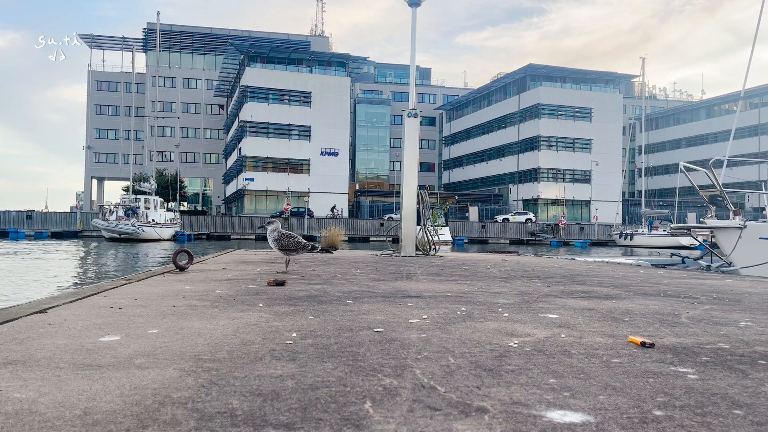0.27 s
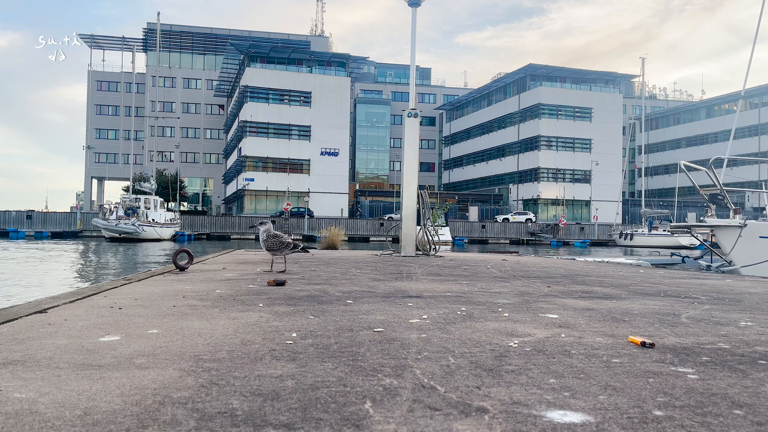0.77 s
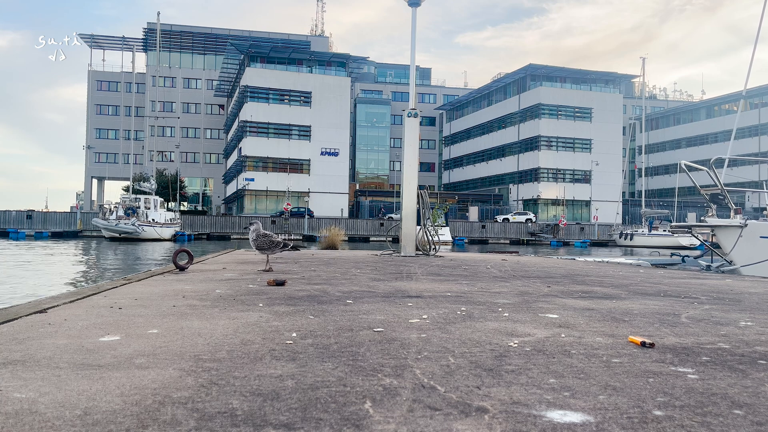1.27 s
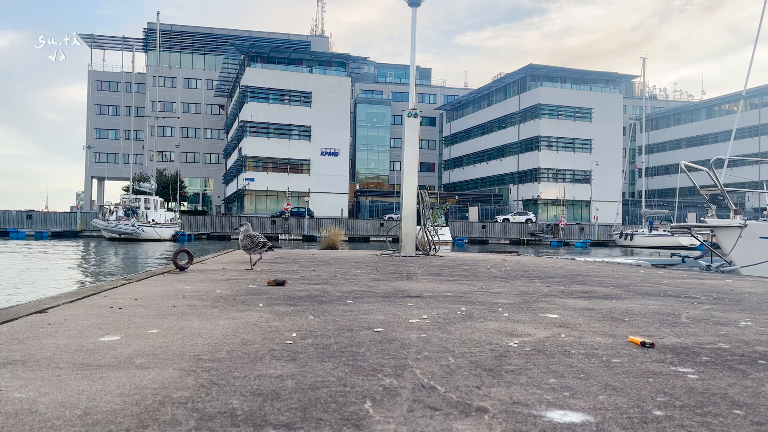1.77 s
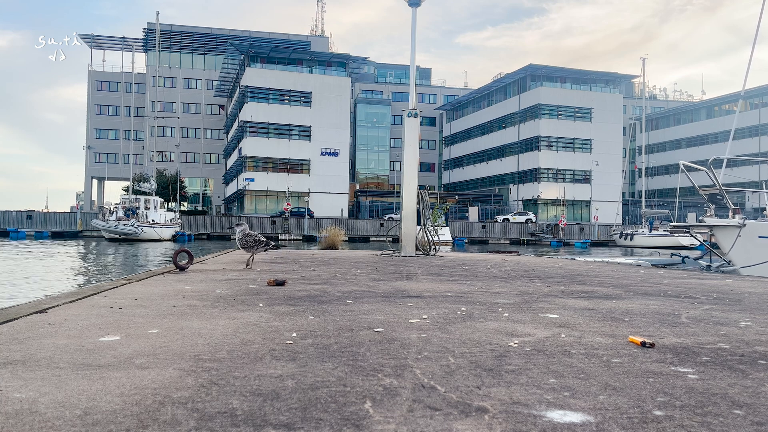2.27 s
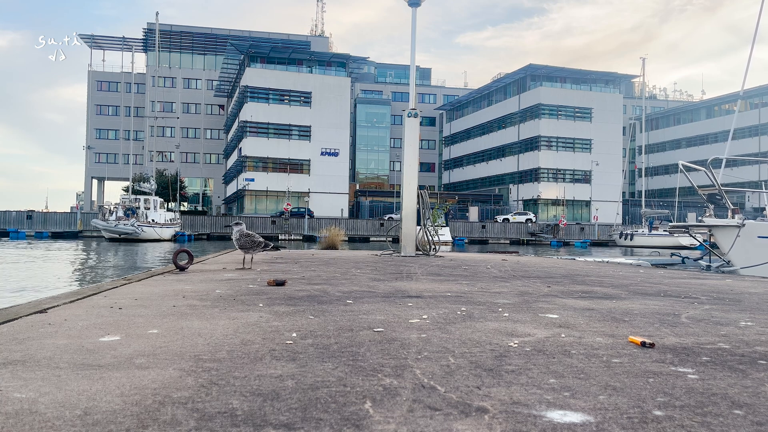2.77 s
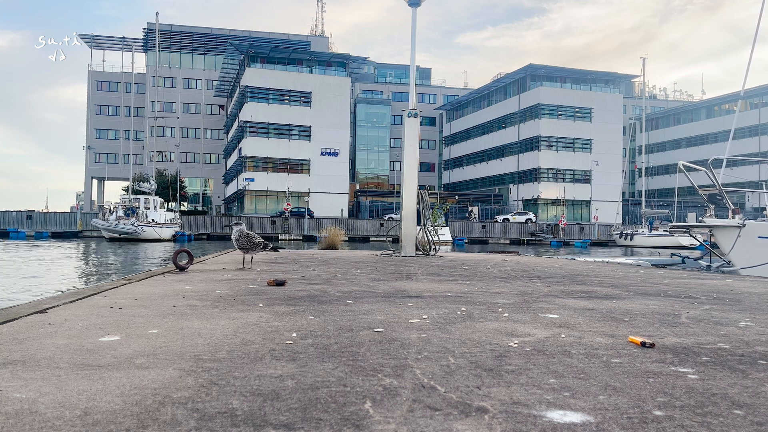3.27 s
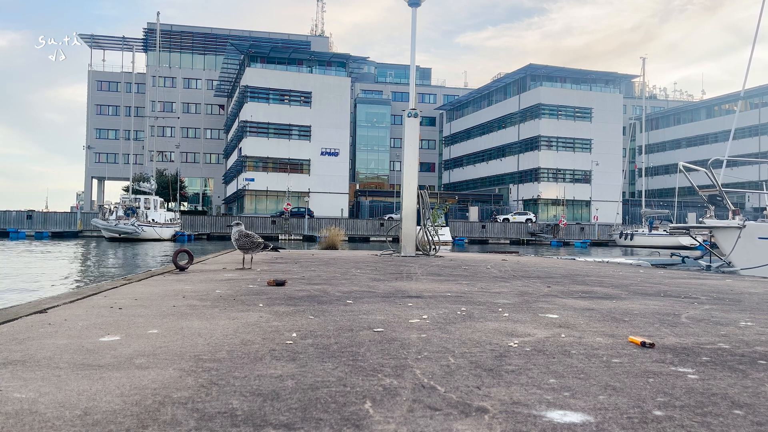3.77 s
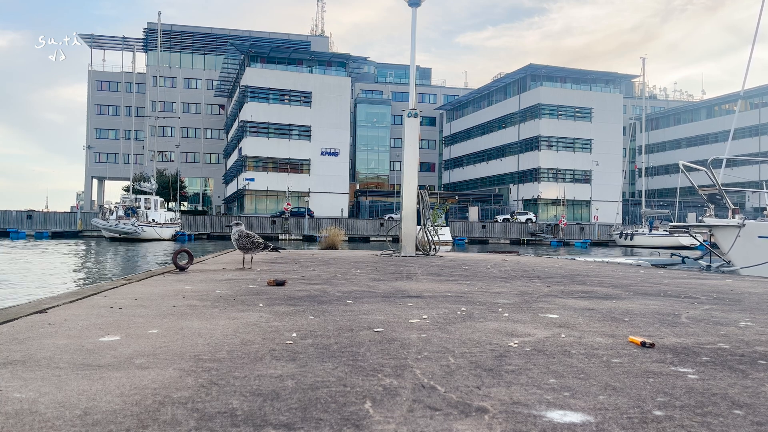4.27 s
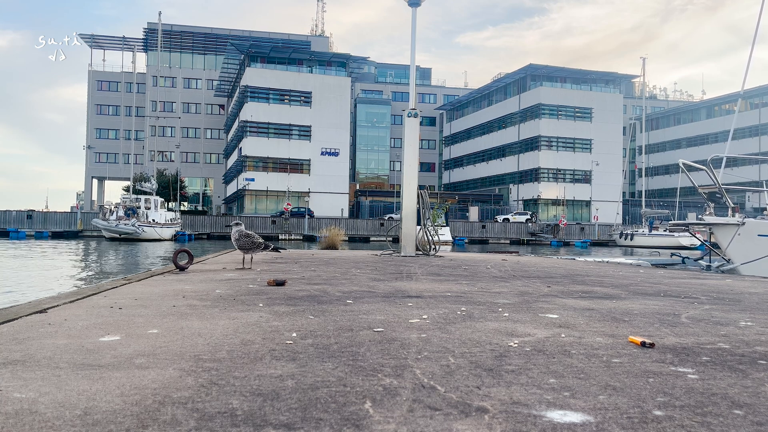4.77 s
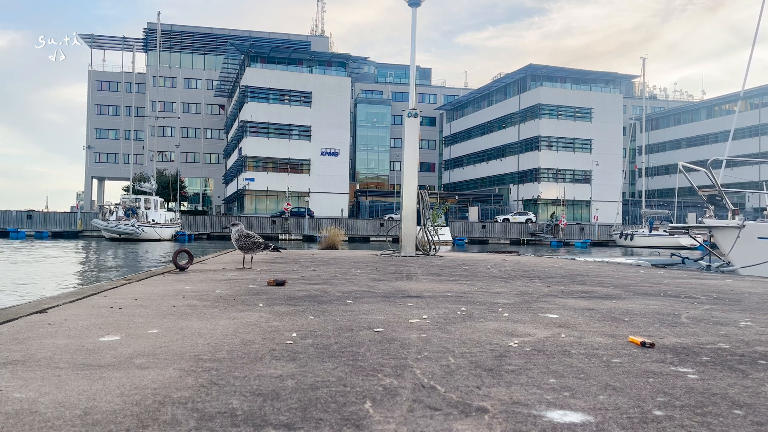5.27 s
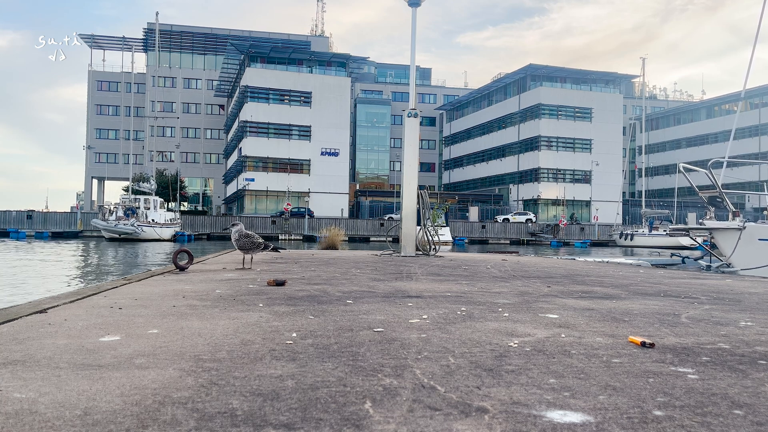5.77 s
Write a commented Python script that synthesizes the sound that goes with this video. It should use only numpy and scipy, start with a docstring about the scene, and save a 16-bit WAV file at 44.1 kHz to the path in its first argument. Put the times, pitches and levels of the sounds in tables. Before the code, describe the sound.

Outdoors on a harbour quay, a steady low town rumble and wind buffeting the microphone lie under young gulls. A sharp, thin falling cry comes early, weaker ones follow, then a hoarse broken cry midway and a strong one near the end. Other gulls answer faintly from both sides. Echoes return from buildings across the water; a small songbird whistles faintly high up twice.

```python
"""Open harbour quay: young gulls cry in short falling notes, ahead and to both sides, and a small songbird is heard.
Cries are stacks of gliding partials with bursts of hoarse pulsed noise; the songbird is bending pure tones.
Wind is low noise with timed thumps; the town's rumble, a hiss stronger on the left and a thin treble are
coloured noise. Small ticks are ringing clicks. The quay close by and the buildings across the water
return the cries as scattered echoes, and the buildings also as single slaps."""
import sys
import numpy as np
from scipy import signal
from scipy.fft import rfft, irfft, next_fast_len
from scipy.io import wavfile
from scipy.ndimage import uniform_filter1d, map_coordinates

SR = 44100
rng = np.random.default_rng(int(sys.argv[2]) if len(sys.argv) > 2 else 0)


def store_pcm(level_fs):
    """Save levels as 16-bit WAV."""
    pcm = np.round(np.clip(level_fs, -1, 1) * 32767).astype(np.int16)
    wavfile.write(sys.argv[1], SR, np.atleast_2d(pcm).T)


N = 265658  # samples in the scene


def gain_of(db):
    """Turn decibels into a factor on the wave."""
    return 10 ** (np.asarray(db) / 20)


def evened(x):
    """Scale to an average (RMS) strength of 1."""
    return x / np.sqrt(np.mean(x ** 2) + 1e-20)


def smoothed(x, size):
    """Two running averages turn fast noise into slow wandering."""
    return uniform_filter1d(uniform_filter1d(x, size=size), size=size)


def read(points, hz):
    """Read a curve between its points, with pitch spaced as the ear hears it (logarithmically)."""
    f, value = np.transpose(points)
    return np.interp(np.log(hz + 1), np.log(f + 1), value)


def shape(x, colour):
    """Raise or lower each frequency by a curve in dB."""
    size = next_fast_len(N + 4096)
    hz = np.fft.rfftfreq(size, 1 / SR)
    return irfft(rfft(x, size) * gain_of(read(colour, hz)), size)[..., :N]


def resonate(x, hz, width):
    """One resonance of gain 1 at its peak, applied twice for dark valleys."""
    b, a = signal.iirpeak(hz, hz / width, SR)
    return signal.lfilter(b, a, signal.lfilter(b, a, x))


def play(sounds):
    """Place each (start, sound) on two channels and add them up."""
    mix = np.zeros((2, N))
    for s, sound in sounds:
        part = mix[:, round(s * SR):][:, :sound.shape[-1]]
        part += sound[..., :part.shape[-1]]
    return mix


def wash(colour, level, patchy_db, alike):
    """Two channels of noise with drifting patches of pitch and time, following a level curve."""
    # how alike left and right are, before the factor alike: (f/Hz, likeness 0-1)
    likeness = [(60, .94), (250, .84), (800, .83), (1500, .67), (2000, .45), (4000, .5), (6000, .2),
                (9000, .6)]
    frames, hz = N // 256 + 5, np.fft.rfftfreq(1024, 1 / SR)
    a, b, c, d, patches = rng.standard_normal((frames, 513, 5)).T
    patches = uniform_filter1d(uniform_filter1d(patches, size=14, axis=0), size=14, axis=1)
    patches = evened(patches)
    same = np.clip(alike * read(likeness, hz), -1, 1)[:, None]
    left, other = a + 1j * b, c + 1j * d
    spectrum = np.array([left, same * left + np.sqrt(1 - same ** 2) * other])
    spectrum *= gain_of(read(colour, hz)[:, None] + patchy_db * patches)
    noise = evened(signal.istft(spectrum, nperseg=1024, noverlap=768)[1][:, :N])
    s, db = np.transpose(level)
    return gain_of(np.interp(np.arange(N) / SR, s, db)) * noise


def town_rumble():
    """Steady noise, strongest in the lows and fading towards the treble."""
    # tone colour of the town: (f/Hz, relative level per Hz/dB)
    colour = [(60, -49), (120, 2), (250, -2), (600, -5.5), (1000, -11.5), (1550, -21), (1800, -29),
              (3000, -39), (4600, -47), (6200, -57), (8500, -66), (12000, -65.5), (13000, -79),
              (17000, -83.5)]
    return wash(colour, [(0, -45), (6, -45)], patchy_db=1.0, alike=0.85)


def wind(steadied=0.6, alike=0.96):
    """Low buffeting, nearly alike at both ports of the microphone, with timed thumps on top."""
    # tone colour of the wind: (f/Hz, relative level per Hz/dB)
    colour = [(12, -46.5), (25, -31), (33, -10.5), (42, -1.5), (55, 4.5), (70, 0), (95, -1), (125, -10.5),
              (170, -18), (260, -43), (400, -92.5)]
    # level between buffets: (t/s, level/dB)
    calm = [(0, -43), (.5, -46.5), (.87, -47), (1.2, -43.5), (1.6, -46.5), (2.0, -43.5), (2.4, -45),
            (2.6, -37), (2.8, -44.5), (3.08, -36), (3.25, -44.5), (3.45, -39), (3.7, -48), (3.95, -41),
            (4.2, -49.5), (4.6, -43), (4.8, -47.5), (5.3, -46.5), (6.02, -46)]
    # single thumps: (peak t/s, level/dB, length/s)
    buffets = [(0.229, -47, 0.048), (1.217, -34.5, 0.045), (1.35, -38.5, 0.057), (1.417, -36, 0.032),
               (1.571, -38.5, 0.088), (1.661, -34.5, 0.048), (1.764, -31.5, 0.043), (2.308, -37.5, 0.082),
               (2.521, -33.5, 0.052), (2.676, -35.5, 0.072), (2.936, -35.5, 0.045), (2.994, -30, 0.039),
               (3.359, -32, 0.035), (3.776, -37, 0.035), (3.851, -34, 0.018), (3.978, -35.5, 0.023),
               (4.133, -33, 0.039), (4.57, -39, 0.091), (4.889, -39.5, 0.088), (5.366, -38, 0.022),
               (5.457, -39.5, 0.035), (5.697, -38, 0.017), (5.795, -43, 0.019), (6.002, -30.5, 0.033)]
    left, other = shape(rng.standard_normal((2, N)), colour)
    x = evened(np.array([left, alike * left + np.sqrt(1 - alike ** 2) * other]))
    # part of the chance throb is evened out, since the buffets carry the lumps
    throb = np.sqrt(uniform_filter1d((x ** 2).mean(0), size=1500) + 1e-3)
    t = np.arange(N) / SR
    thumps = sum(gain_of(db) * np.exp(-(2 * (t - s) / length) ** 2) for s, db, length in buffets)
    level = np.hypot(gain_of(np.interp(t, *np.transpose(calm))), thumps)
    return evened(x / throb ** steadied) * level


def left_hiss():
    """Patchy high noise that swells and sinks, stronger on the left."""
    # tone colour of the hiss: (f/Hz, relative level per Hz/dB)
    colour = [(1500, -20.5), (2600, -3.5), (4000, -0.5), (5000, -7), (5900, -20), (8000, -71)]
    # level before the left-right tilt: (t/s, level/dB)
    level = [(0.0, -78), (0.32, -83), (0.6, -74), (0.8, -84), (1.02, -79), (1.41, -74), (1.83, -78.5),
             (2.7, -76), (2.8, -79.5), (3.2, -83.5), (3.97, -80), (4.48, -78.5), (4.64, -79), (4.9, -85.5),
             (5.15, -77.5), (5.3, -84), (5.47, -74), (5.65, -74.5), (6.02, -74.5)]
    return wash(colour, level, patchy_db=2.2, alike=0.92) * gain_of([[5], [-4]])  # dB left, right


def thin_treble():
    """A faint patchy sheen of very high noise that comes and goes."""
    # tone colour of the sheen: (f/Hz, relative level per Hz/dB)
    colour = [(4500, -31), (5800, -10.5), (6800, 4), (8000, -4.5), (8600, -14), (11500, -10.5),
              (12500, -39)]
    # its swelling and sinking: (t/s, level/dB)
    level = [(0.0, -74), (.12, -91), (0.35, -93), (0.45, -83), (.75, -87.5), (1.3, -94), (2.05, -101),
             (2.14, -86.5), (2.72, -84.5), (2.8, -101), (3.3, -93.5), (3.97, -103), (4.4, -97),
             (4.76, -89.5), (5.1, -101), (5.8, -100), (6.02, -81)]
    return wash(colour, level, patchy_db=3.5, alike=0.59)


def note(hz, db, lag, lean_db, rough, halves, fade_s=0.005, airflow_db=0):
    """Partials on one pitch; rough cycles smear the upper ones, strong-weak cycles add lines half-way between."""
    n = len(hz)
    drift, jitter, shake = (evened(smoothed(rng.standard_normal(n), size)) for size in (250, 60, 40))
    air = evened(resonate(rng.standard_normal(n), 7400, 2400)) * gain_of(db[-1] + airflow_db)
    turns = np.cumsum(hz * (1 + .003 * drift)) / SR + .09 * rough * np.tanh(jitter)
    side = np.array([[-.5], [.5]])  # left, right
    # the moving throat makes each partial swell and dip on its own
    flicker = evened(smoothed(rng.standard_normal((6, n)), 300))
    db = np.array(db) + 2.2 * flicker[:len(db)]
    partials = [gain_of(d) * np.sin(2 * np.pi * (k + 1) * turns + side * lag) for k, d in enumerate(db)]
    tone = partials[0] + sum(partials[1:]) * (1 + 2 * halves * np.cos(np.pi * turns))
    tone = np.sqrt(2) * tone * (1 + .9 * rough * np.tanh(shake)) + air
    tone = tone * gain_of(-side * lean_db)
    return tone * signal.windows.tukey(n, min(1, 2 * fade_s * SR / n))


def cry(start, hold, slide, held_hz, end_hz, db1, db2, db3, db4, first_change_db, upper_change_db, side, voice):
    """The pitch settles, holds, then slides to its end while the levels drift and single partials swell or dip."""
    # kinds of voice: name: (roughness 0-1, half-pitch share 0-1, share of the second flutter 0-1)
    voices = {"clear": (.11, 0, .05), "split": (.16, .03, .18), "husky": (.25, .08, .05),
              "rough": (.5, .17, .1), "doubled": (.42, .38, .05), "broken": (.45, .7, .1),
              "hoarse": (.7, .5, .2)}
    # where a gull sits: name: (left's lag/radians, left minus right/dB), before the microphone ports
    sides = {"ahead": (0, 0), "left": (2.5, 4), "right": (-2.6, -2)}
    # a partial swells or dips as the throat shifts: (middle t/s, partial, change/dB, length/s)
    shifts = [(0.071, "fourth", -10.5, .03), (.14, "fourth", -13.5, .04), (0.41, "third", -11.5, 0.052),
              (.47, "third", -2.5, .02), (.49, "fourth", -14, .06), (.46, "fifth", -13, .2),
              (1.14, "third", -15.5, 0.034), (1.185, "third", 7, .04), (1.13, "second", -11.5, 0.018),
              (1.2, "second", -7.5, 0.043), (1.17, "fourth", -9, .15), (2.1, "fourth", -9, .1),
              (2.14, "third", -14, 0.054), (2.118, "second", -7.5, .015), (.5, "second", -3, .04),
              (3.29, "sixth", -12, .1), (3.4, "sixth", -14, .3), (3.39, "fifth", -12, 0.12),
              (5.22, "fifth", 5.5, .05), (3.355, "third", -3, 0.014), (3.297, "first", -11, 0.0051),
              (3.295, "second", -13.5, .008), (3.295, "third", -11, .008), (3.355, "second", -7, 0.045),
              (3.385, "second", 3.5, 0.016), (3.375, "third", -5, 0.017), (3.425, "third", -14, 0.031),
              (3.43, "second", -7, .03), (3.35, "fourth", -13, 0.023), (3.435, "fourth", -2, 0.025),
              (3.51, "third", -13, 0.044), (3.46, "fourth", -3.5, 0.088), (5.258, "third", -29, 0.02),
              (5.32, "third", 5.5, 0.095), (5.364, "third", -10.5, 0.016), (5.388, "third", -4, 0.0092),
              (5.405, "third", 7, 0.053), (5.365, "second", 6, 0.091), (5.4, "first", -4.5, .04),
              (5.35, "fourth", 3.5, .05), (5.29, "fifth", -1, 0.022), (5.34, "fifth", 2.5, 0.081),
              (5.383, "fifth", -8.5, .03), (5.43, "fifth", 2, .07), (5.58, "third", 4, .06),
              (5.06, "second", -8, .06), (5.06, "third", -8, .06), (5.06, "first", -3, 0.043),
              (5.33, "sixth", -9, 0.059)]
    # names of the partials, lowest first
    partial_names = ("first", "second", "third", "fourth", "fifth", "sixth")
    t = np.arange(0, hold + slide, 1 / SR)
    slid = np.clip((t - hold) / slide, 0, 1) ** .65  # power under 1: the slide is fastest at first
    settling = 1 + .011 * np.exp(-t / .018)  # starts a little sharp
    hz = held_hz * settling + (end_hz - held_hz) * slid
    upper = (db2, db3, db4, db4 - 7.5, db4 - 9.5)  # fifth and sixth lie below the fourth
    db = [db1 + first_change_db * t / t[-1]] + [d + upper_change_db * t / t[-1] for d in upper]
    for s, partial, change_db, length in shifts:
        if start - length < s < start + t[-1] + length:
            k = partial_names.index(partial)
            db[k] = db[k] + change_db * np.exp(-(2 * (start + t - s) / length) ** 2)
    taper = np.minimum((t[-1] - t) / .015, 1)  # the last 15 ms die away
    rough, halves, flutter = voices[voice]
    # a second, slower vibration sets in with the slide and puts side lines round each partial
    flutter_hz = 325
    taper = taper * (1 + 2 * flutter * np.sqrt(slid) * np.cos(2 * np.pi * flutter_hz * t))
    hz = uniform_filter1d(hz, size=350, mode="nearest")
    return start, taper * note(hz, db, *sides[side], rough, halves)


def gull_cries():
    """All the voiced gull notes, each a stack of six partials."""
    # one row a note: (start t/s, hold/s, slide/s, held f/Hz, end f/Hz,
    # basic level/dB of partials 1, 2, 3, 4, change/dB by the end of partial 1, of the upper ones, side, voice)
    rows = [ (.005, 0.022, 0.052, 1280, 1210, -78, -97, -69, -100, -4, -8, "ahead", "husky"),
            (0.076, 0.0034, 0.062, 1410, 1307, -76.5, -66.5, -92.5, -77.5, 1, 0.5, "ahead", "clear"),
            (.322, 0.012, 0.038, 1262, 1115, -43, -88.5, -99.5, -100, 4, -6.5, "ahead", "husky"),
            (0.355, 0.055, 0.026, 1472, 1525, -44.5, -86.5, -99, -105, 12, 15, "ahead", "clear"),
            (.42, 0.046, .056, 1309, 1216, -31, -56, -61, -76.5, -14.5, -0.5, "ahead", "split"),
            (0.499, 0.027, 0.034, 1900, 1736, -63, -81, -90, -100, -6, -8, "left", "hoarse"),
            (.51, 0.044, 0.06, 1290, 1158, -45.5, -68, -75.5, -93.5, -2, -6.5, "ahead", "hoarse"),
            (0.551, 0.017, 0.02, 1587, 1550, -51, -85.5, -100, -101, -4, -2, "ahead", "husky"),
            (0.951, .1, 0.058, 1095, 1150, -61, -95.5, -93.5, -100, -5, -1, "right", "husky"),
            (1.13, 0.0023, 0.14, 1559, 1306, -48, -62.5, -73.5, -88, 2.5, -15, "ahead", "husky"),
            (1.253, 0.0015, 0.055, 1123, 933, -50, -88, -87, -87, -1, -5.5, "ahead", "husky"),
            (1.727, 0.035, 0.023, 1260, 1260, -77.5, -73.5, -87.5, -100, -2.5, 5.5, "left", "clear"),
            (1.72, .002, 0.052, 902, 1075, -56.5, -92.5, -95, -94, -2.5, -0.5, "right", "husky"),
            (1.775, .045, 0.094, 1140, 1052, -55, -84, -86, -100, -7, -7.5, "right", "husky"),
            (2.079, 0.00094, 0.088, 1550, 1334, -49, -69.5, -70, -80, 5.5, -7.5, "ahead", "husky"),
            (2.155, 0.02, 0.019, 1089, 1013, -46.5, -89, -93, -86, 1, 2, "ahead", "rough"),
            (2.52, 0.085, 0.087, 1133, 1040, -60, -99.5, -88.5, -85.5, -5.5, -8, "right", "clear"),
            (3.28, .015, 0.024, 1328, 1300, -44, -64, -58.5, -74, -6.5, -9.5, "ahead", "broken"),
            (3.326, 0.01, 0.033, 1630, 1670, -62, -68.5, -72, -86, 1, 10, "ahead", "broken"),
            (3.35, 0.0032, .086, 1579, 1414, -42.5, -53, -53.5, -61, -4, -8.5, "ahead", "husky"),
            (3.43, 0.055, .045, 1148, 1077, -48, -62, -55.5, -61.5, 1, -14, "ahead", "doubled"),
            (3.724, 0.017, 0.032, 1140, 1103, -60, -72.5, -82.5, -98, 1.5, 1, "left", "rough"),
            (3.73, .05, 0.037, 1485, 1450, -68, -72.5, -79, -100, 1, 2, "ahead", "rough"),
            (3.797, 0.01, 0.04, 1250, 1237, -65, -68.5, -74, -100, -7.5, 1, "left", "husky"),
            (3.83, .03, .065, 1110, 1264, -66, -83.5, -87, -100, -1.5, -1, "right", "rough"),
            (5.049, 0.077, 0.032, 1112, 1147, -62.5, -74.5, -74.5, -104, 9.5, 12, "left", "broken"),
            (5.149, 0.04, 0.033, 1262, 1200, -58, -55, -63.5, -87, -4, -2.5, "left", "clear"),
            (5.197, 0.02, 0.025, 1154, 1154, -41.5, -68.5, -65.5, -71, -2, 2, "ahead", "doubled"),
            (5.231, 0.013, 0.021, 1572, 1590, -32.5, -66, -76, -75, -4.5, -2, "ahead", "husky"),
            (5.251, .11, .112, 1326, 1207, -33, -52.5, -50, -54, -10.5, -4, "ahead", "split"),
            (5.46, .14, .04, 1689, 1464, -57.5, -72.5, -79, -92, -2, 1, "ahead", "rough"),
            (5.469, 0.1, 0.07, 1214, 1114, -49, -68.5, -66.5, -68, 1, -11.5, "ahead", "hoarse"), ]
    return play(cry(*row) for row in rows)


def facades(x, gap_s):
    """After a gap, scattered echoes of random sign, each band dying at its own speed."""
    # how long echoes last: (f/Hz, time to fall by 60 dB/s)
    dying = [(1000, 1.5), (2600, 0.53), (4000, 16), (5300, 2), (6500, 1.1)]
    taps = np.zeros((2, SR))
    at = np.arange(0, SR - 20, 20) + rng.integers(0, 20, (2, SR // 20 - 1))
    np.put_along_axis(taps, at, rng.choice([-1., 1.], at.shape), 1)
    hz, t, spectrum = signal.stft(taps, SR, nperseg=256)
    fall = gain_of(-60 * t / read(dying, hz)[:, None])
    tail = signal.istft(spectrum * fall, SR, nperseg=256)[1]
    tail = np.pad(tail / np.linalg.norm(tail[0]), ((0, 0), (round(gap_s * SR), 0)))
    return signal.fftconvolve(x[None], tail, axes=1)[:, :N]


def near_quay(x):
    """Soft scattered echoes that come back almost at once."""
    return gain_of(-24) * facades(x, gap_s=0.016)


def slaps(x):
    """Flat walls return whole cries, one after another."""
    # single returns: (delay/s, level/dB, left minus right/dB), on top of the walls' own tone colour
    walls = [(.205, -22.5, 2.5), (.275, -17.5, 0), (.43, -24.5, -2), (.585, -22, -0.5)]
    return play((delay, x * gain_of([[db + lean_db / 2], [db - lean_db / 2]])) for delay, db, lean_db in walls)


def wavered(x):
    """Moving air over the water stretches and squeezes the trip, so distant tones waver."""
    waver_s = .00009  # typical (RMS) change of delay
    at = np.arange(N) + waver_s * SR * evened(smoothed(rng.standard_normal(N), 700))
    return np.array([map_coordinates(channel, [at], order=3, mode="nearest") for channel in x])


def far_walls(x):
    """Buildings across the water colour the cries and return them, scattered and as slaps."""
    # what the walls return: (f/Hz, level/dB)
    colour = [(1000, -12.5), (1500, -7.5), (2600, -3.5), (4000, -5.5), (5300, -18), (6500, -34)]
    returned = shape(x, colour)
    return wavered(gain_of(-18.0) * facades(returned, gap_s=.27) + slaps(returned))


def rasp(peak, rise, fall, pulse_hz, *levels_db):
    """Stumbling pulses and uneven puffs of air through throat and beak, swelling and dying."""
    # resonances of the throat: (f/Hz, width of one pass/Hz, relative level/dB)
    throat = [(1080, 200, -6.5), (1550, 300, 15)]
    # resonances of the beak: (f/Hz, width of one pass/Hz, relative level/dB)
    beak = [(2620, 1900, 3), (3520, 540, 7), (4260, 1100, -21.5)]
    # resonances of the thin hiss: (f/Hz, width of one pass/Hz, relative level/dB)
    thin = [(5080, 1500, 7), (6200, 1200, -1), (6730, 980, -0.5)]
    t = np.arange(-rise, fall, 1 / SR)
    air, puffs, stumble = rng.standard_normal((3, len(t)))
    turns = pulse_hz * t + .05 * evened(smoothed(stumble, 120))
    pulses = evened(np.cos(2 * np.pi * np.arange(1, 13)[:, None] * turns).sum(0))
    pulse_share = .42  # of the power, before the puffs
    air = np.sqrt(pulse_share) * pulses + np.sqrt(1 - pulse_share) * air
    air *= gain_of(2.5 * evened(uniform_filter1d(puffs, size=200)))
    sound = 0
    for level_db, tube in zip(levels_db, (throat, beak, thin)):
        ringing = sum(gain_of(db) * resonate(air, f, width) for f, width, db in tube)
        sound = sound + gain_of(level_db) * evened(ringing)
    swell = gain_of(-17 * np.maximum(-t / rise, t / fall))  # dB at both ends, 0 at the peak
    return peak - rise, sound * swell * signal.windows.tukey(len(t), .4)


def gull_rasps():
    """Hoarse noise where the gulls' voices break."""
    # one row a burst: (peak t/s, rise/s, fall/s, pulse f/Hz,
    # throat level/dB, beak level/dB, thin hiss level/dB, all before the swell)
    rows = [(0.348, 0.063, 0.022, 595, -57, -80, -94), (0.518, 0.047, 0.064, 626, -50, -83, -73),
            (.585, 0.055, .1, 590, -50, -68, -80), (1.096, 0.054, 0.039, 560, -57.5, -68.5, -85),
            (3.287, 0.009, 0.022, 681, -61, -54, -61), (3.301, .01, 0.036, 657, -66, -59, -63),
            (3.355, 0.11, 0.017, 828, -77.5, -62, -67.5), (3.449, .03, 0.068, 576, -77.5, -62, -59.5),
            (3.505, 0.037, 0.05, 554, -57, -63, -71.5), (3.785, 0.074, 0.044, 721, -73.5, -71, -85.5),
            (5.118, 0.055, 0.041, 570, -74.5, -67.5, -86), (5.207, 0.033, 0.059, 580, -48, -66, -67),
            (5.255, 0.038, 0.01, 793, -57, -54, -56), (5.47, 0.019, 0.08, 603, -50.5, -58, -61),
            (5.583, .065, 0.055, 592, -56, -57, -54)]
    return play(rasp(*row) for row in rows)


def tick(s, db, hz, width, decay):
    """A short dull snap: one click, then a dying crackle."""
    t = np.arange(2500) / SR
    crackle = rng.standard_normal(2500) * np.minimum(t / .002, 1) + 4 * (t == 0)
    return s, gain_of(db) * evened(resonate(crackle, hz, width)) * np.exp(-t / decay)


def small_ticks():
    """Ticks that fall here and there."""
    # one row a tick: (start t/s, level before the decay/dB, centre f/Hz, width of one pass/Hz, decay/s)
    rows = [(0.686, -72, 6000, 1500, 0.0058), (.898, -74, 6340, 2500, .004),
            (1.547, -67.5, 5200, 2260, 0.0035), (1.958, -64, 3570, 1980, 0.0076),
            (2.124, -50.5, 4600, 4000, 0.0008), (3.052, -67, 3000, 1990, 0.027),
            (4.032, -73.5, 6780, 3000, 0.006), (4.062, -78, 7000, 2500, 0.0088),
            (4.088, -80, 6200, 2000, .005), (4.379, -70, 6940, 3500, 0.0037),
            (5.873, -69.5, 5030, 2060, 0.035)]
    return play(tick(*row) for row in rows)


def whistle(start, length, first_hz, last_hz, db, change_db):
    """One pure tone that bends late, with a trace of breath."""
    u = np.arange(0, length, 1 / SR) / length
    hz = first_hz + (last_hz - first_hz) * u ** 1.6  # power over 1: bends late
    tone = note(hz, [db + change_db * u], lag=0.22, lean_db=4.0, rough=0.15, halves=0,
                fade_s=0.008, airflow_db=-34.0)
    return start, tone


def small_songbird():
    """High whistled notes of a small songbird."""
    # one row a note: (start t/s, length/s, first f/Hz, last f/Hz, basic level/dB, change by the end/dB)
    rows = [(2.753, 0.056, 4060, 3980, -71, -3), (2.796, 0.052, 4770, 4900, -77, -0.5),
            (2.87, 0.063, 5780, 5930, -90, 3), (2.959, 0.12, 5450, 5290, -81, -3.5),
            (3.078, 0.13, 4720, 4430, -74, -6.5), (3.864, .02, 4170, 4140, -76.5, 3.5),
            (3.892, 0.022, 4190, 4160, -72.5, 1.5), (3.9, 0.038, 4890, 4920, -76.5, 0),
            (3.927, 0.2, 5630, 5380, -78, -1), (3.938, .022, 4150, 4180, -74, 1),
            (4.11, 0.15, 4820, 4570, -75.5, -1)]
    return play(whistle(*row) for row in rows)


def scene():
    """Add up the air, the birds, the ticks and the echoes."""
    # treble lost on the way: (f/Hz, level/dB)
    muffle = [(5000, 0), (6500, 0), (7000, -9), (8000, -17), (8500, -42), (12000, -60)]
    background = town_rumble() + wind() + left_hiss() + thin_treble()
    gulls = shape(gull_cries() + gull_rasps(), muffle)
    ticks = shape(small_ticks(), muffle)
    songbird = small_songbird()
    echoes = near_quay(gulls[1] + songbird[1]) + far_walls(gulls[1])  # fed by the right channel
    return background + gulls + ticks + songbird + echoes


def record(dry):
    """Each microphone port hears with its own delay and colour; then the highest treble is cut."""
    # how far the left port is ahead: (f/Hz, lead/radians)
    lead = [(0, 0), (170, .35), (520, 2.1), (1290, 3.0), (1640, 3.7), (2150, 5.2), (2700, 6.3), (3700, 8.4),
            (4000, 10.0), (5000, 11.5), (6000, 12.9), (6500, 14.7), (7500, 17.2), (11000, 19.0)]
    # how the ports differ in strength: (f/Hz, left minus right/dB)
    lean = [(170, 0), (500, 3.5), (900, 3), (1400, -6), (1650, -4), (1850, 6), (2700, 1.5), (4000, 3.5),
            (4700, 1), (5400, 3), (5850, 9), (6400, 2), (7500, -2), (9000, 0)]
    pad = 2048  # samples, so that the ends stay smooth
    wide = np.pad(dry, ((0, 0), (pad, pad)), "reflect", reflect_type="odd")
    size = next_fast_len(wide.shape[1])
    hz = np.fft.rfftfreq(size, 1 / SR)
    # half of each difference goes to the left, the opposite half to the right
    half = gain_of(read(lean, hz) / 2) * np.exp(.5j * np.interp(hz, *np.transpose(lead)))
    heard = irfft(rfft(wide, size) * np.array([half, 1 / half]), size)
    low_pass = signal.firwin(511, 20000, window=("kaiser", 9), fs=SR)  # edge in Hz
    heard = signal.oaconvolve(heard, low_pass[None], "same")
    return heard[:, pad:pad + N]


dry = scene()
out = record(dry)
store_pcm(out)
```